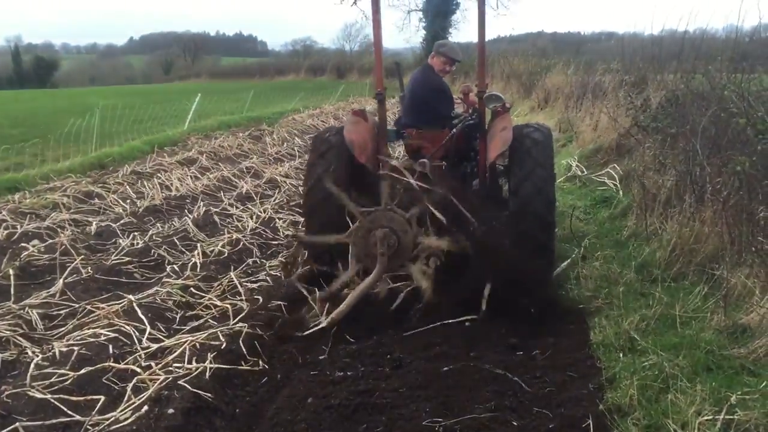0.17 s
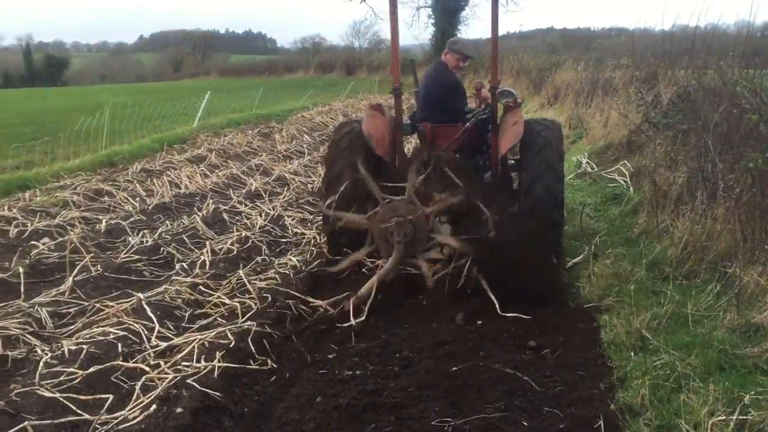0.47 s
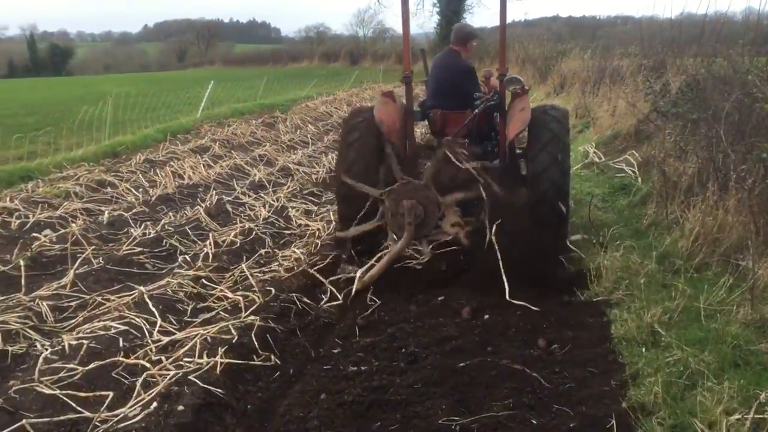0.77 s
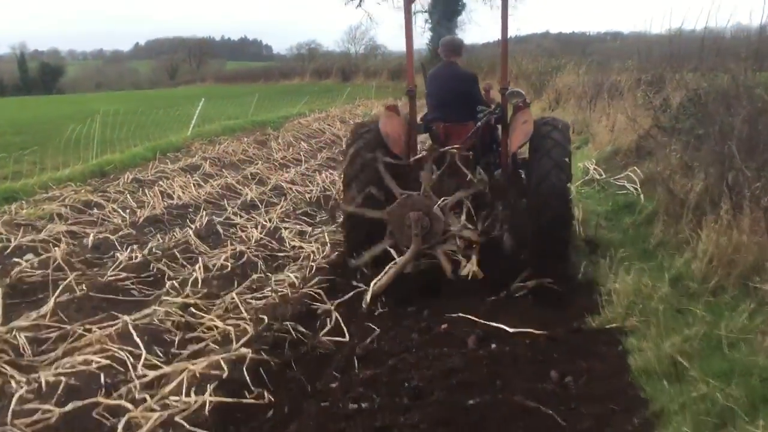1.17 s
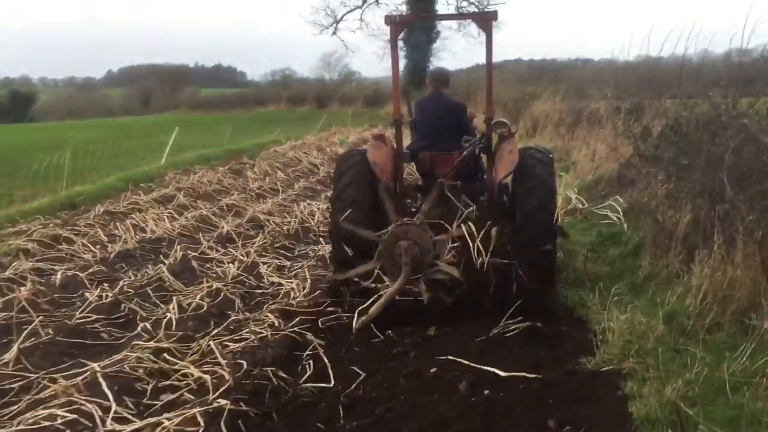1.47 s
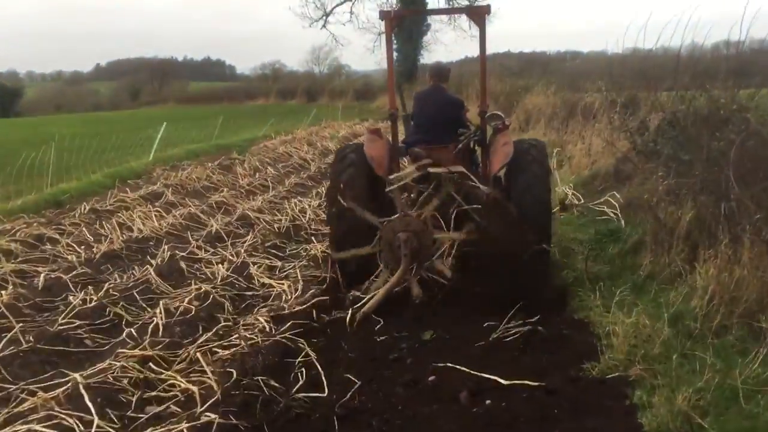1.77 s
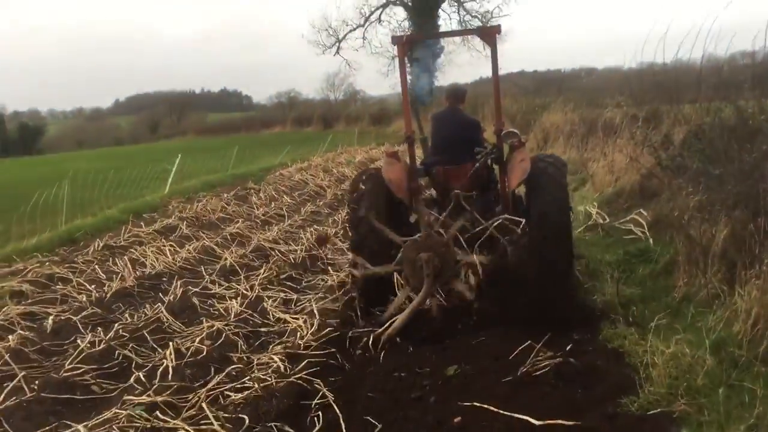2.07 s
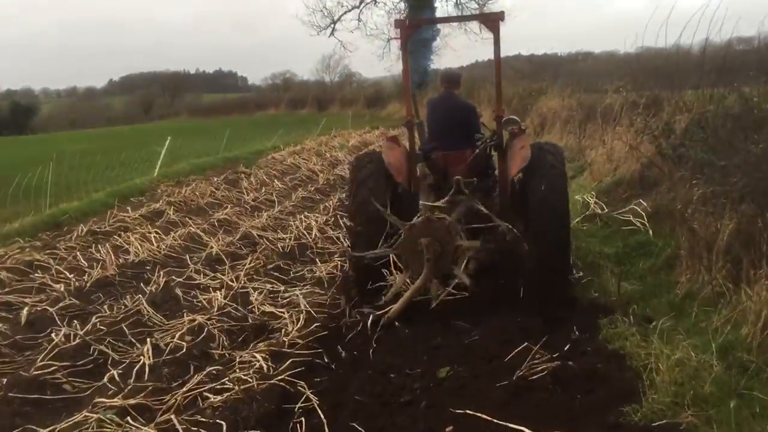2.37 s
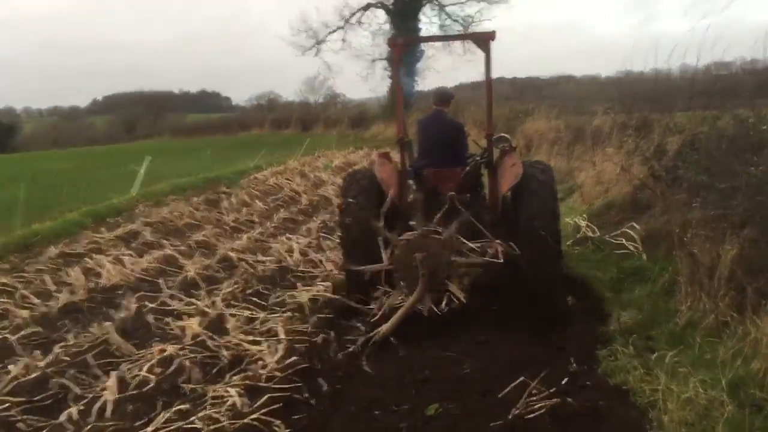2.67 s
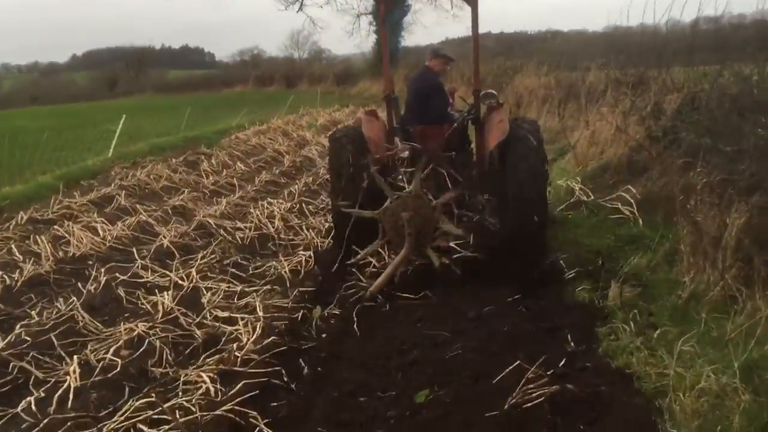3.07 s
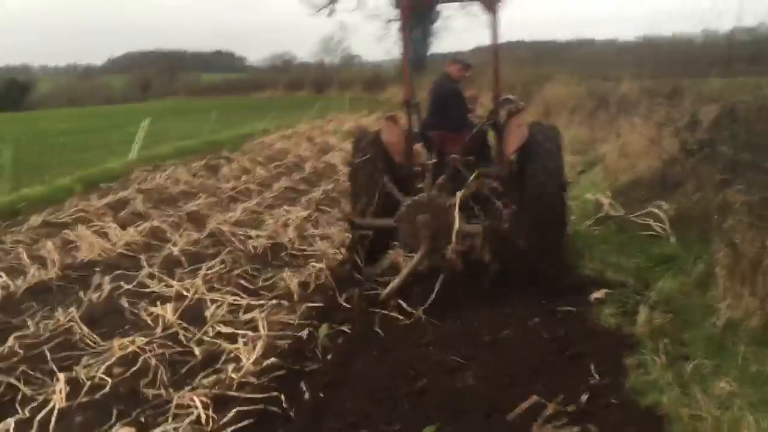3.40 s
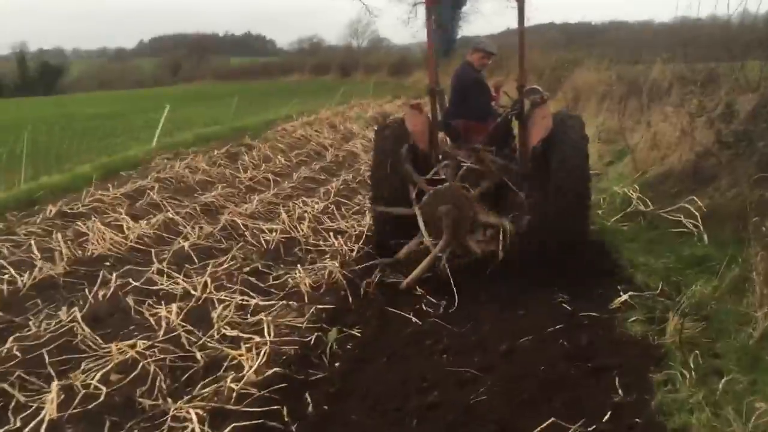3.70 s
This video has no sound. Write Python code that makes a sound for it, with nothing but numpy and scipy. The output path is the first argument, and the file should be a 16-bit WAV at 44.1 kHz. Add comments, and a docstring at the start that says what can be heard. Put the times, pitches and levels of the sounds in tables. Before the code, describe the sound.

Low throbbing old tractor diesel with metallic knocks and churned soil, pulling harder halfway through.

```python
"""A three-cylinder diesel tractor pulls a spinner digger; halfway the engine speeds up under load.
Exhaust: sum of engine-cycle orders. Block: noise-driven modes, struck anew at each firing.
Soil: patchy coloured noise. Gear whine: narrow-band noise. Tappet and grit: resonant noise bursts.
Loud engine knocks ring as two sines; one clod knocks hollowly as a few gliding, decaying sines.
Near the end about 23 ms of the engine's beat is skipped, heard as a step in the beat."""
import sys
import numpy as np
from scipy import signal
from scipy.fft import rfft, irfft, next_fast_len
from scipy.io import wavfile
from scipy.ndimage import uniform_filter1d, map_coordinates

SR = 44100
rng = np.random.default_rng(int(sys.argv[2]) if len(sys.argv) > 2 else 0)


def int16_out(signal):
    """Quantize to a 16-bit WAV file."""
    q = np.round(np.clip(np.atleast_2d(signal).T, -1, 1) * 32767)
    wavfile.write(sys.argv[1], SR, q.astype(np.int16))


N = 169344
CYLINDERS = 3  # a cycle holds one firing of each
CREST_DB = 3  # nominal peak over rms of a short burst


def amp(db):
    """Decibels to amplitude."""
    return 10 ** (np.asarray(db) / 20)


def unit(x):
    """Scale to rms 1."""
    return x / np.sqrt(np.mean(x ** 2) + 1e-20)


def curves(rows):
    """One value per sample for each column after the time."""
    times_s, *columns = np.transpose(rows)
    t = np.arange(N) / SR
    return [np.interp(t, times_s, column) for column in columns]


def wobble(knots_per_s):
    """Smooth random curve through normally distributed knots."""
    knots = rng.standard_normal(int(N * knots_per_s / SR) + 4)
    return map_coordinates(knots, [np.arange(N) * knots_per_s / SR])


def filtered(x, response):
    """Multiply the spectrum of x by a complex response of frequency."""
    m = next_fast_len(x.shape[-1] + 8192)
    spectrum = rfft(x, m) * response(np.fft.rfftfreq(m, 1 / SR))
    return irfft(spectrum, m)[..., :x.shape[-1]]


def peak(hz, width_hz):
    """Response of a causal second-order resonance, gain 1 at its centre."""
    return lambda f: 1j * f * width_hz / (hz * hz - f * f + 1j * f * width_hz)


def rush(spectrum, patchy_db):
    """Coloured noise of rms 1 whose gain varies in random time-frequency patches."""
    z = signal.stft(rng.standard_normal(N), nperseg=512)[2]
    field = uniform_filter1d(rng.standard_normal(z.shape), size=4, axis=0)
    field = uniform_filter1d(field, size=5, axis=1)
    patchy = signal.istft(z * amp(patchy_db * unit(field)), nperseg=512)[1][:N]
    f, db = np.transpose([(spectrum[0][0] / 2, -60), *spectrum, (SR / 2, -120)])
    return unit(filtered(patchy, lambda hz: amp(np.interp(np.log(hz + 1), np.log(f), db))))


def burst(hz, width_hz, t60_s, rise_s):
    """Decaying noise through one resonance twice, peak 1."""
    t = np.arange(SR // 16) / SR
    shape = amp(-60 * t / max(t60_s, .005)) * (1 - np.exp(-t / max(rise_s, 1e-4)))
    resonance = peak(hz, width_hz)
    x = filtered(shape * rng.standard_normal(len(t)), lambda f: resonance(f) ** 2)
    return x / np.abs(x).max()


# Engine speed: (time [s], firing rate [1/s])
FIRING_RATE = [(0.0, 21.92), (0.4, 21.91), (0.8, 21.85), (1.2, 22.25), (1.5, 22.18), (1.8, 21.81),
               (1.9, 21.94), (2.05, 23.54), (2.2, 24.37), (2.35, 25.04), (2.55, 25.12), (2.9, 25.43),
               (3.3, 25.05), (3.84, 25.52)]
START_FIRINGS = .084
SKIP_AT_S, SKIP_FIRINGS = 3.4232, .577


def firings():
    """Firing rate and running firing count, with one skip."""
    rate, = curves(FIRING_RATE)
    skip = SKIP_FIRINGS * (np.arange(N) > SKIP_AT_S * SR)
    return rate, START_FIRINGS + np.cumsum(rate) / SR + skip


# Engine load: (time [s], load [0 light to 1 heavy])
LOAD = [(0, 0), (1.83, 0), (2, .9), (2.3, 1), (3.84, 1)]
# Exhaust orders at light load: (multiple of the cycle rate, level re strongest [dB])
LIGHT_ORDERS = [(1, -42), (2, -40), (3, -38), (4, -36), (5, -33), (6, -12), (7, -22), (8, -22), (9, 0),
                (10, -15), (11, -19), (12, -22), (13, -22), (14, -16), (15, -9), (16, -29), (17, -20),
                (18, -11), (19, -26), (20, -28), (21, -22), (22, -28), (23, -28), (24, -20), (25, -26),
                (26, -30), (27, -29)]
# Exhaust orders at heavy load: (multiple of the cycle rate, level re strongest [dB])
HEAVY_ORDERS = [(1, -39), (2, -38), (3, -38), (4, -36), (5, -36), (6, -8), (7, -20), (8, -27), (9, 0),
                (10, -21), (11, -19), (12, -7), (13, -23), (14, -27), (15, -12), (16, -28), (17, -24),
                (18, -21), (19, -30), (20, -27), (21, -22), (22, -27), (23, -38), (24, -31), (25, -32),
                (26, -36), (27, -30)]
# Exhaust pipe resonances, phase only: (frequency [Hz], width [Hz])
PIPE = [(57, 16), (165, 30)]
# Low rumble spectrum: (frequency [Hz], relative density [dB per Hz])
RUMBLE = [(15, -39), (35, -53), (80, -2), (150, -0.5), (230, -5), (400, -29)]
LIGHT_PEAK_DB, HEAVY_PEAK_DB = -25.5, -22  # strongest order
WAVER_DB = 1  # scale of each order's random level curve
PUFF_FIRINGS = 2.52  # puff position in the cycle
UNEVEN_TURNS = .18  # lead of orders between firing multiples
LEAD_HZ, LEAD_TURNS = 88, .22  # orders above this pitch lead under full load
SHAFT_ORDER, SHAFT_PEAK_DB = 4.09, (-38, -37)  # multiple of firing rate; light, heavy load
RUMBLE_LIGHT_DB, RUMBLE_LOAD_DB = -43, 2  # rms at light load; rise at full load


def exhaust():
    """Cycle orders aligned on the puff, phase-lagged by pipe resonances; geared shaft hum; rumble."""
    rate, count = firings()
    load, = curves(LOAD)
    out = np.zeros(N)
    for (k, light_db), (_, heavy_db) in zip(LIGHT_ORDERS, HEAVY_ORDERS):
        db = (light_db + LIGHT_PEAK_DB) * (1 - load) + (heavy_db + HEAVY_PEAK_DB) * load
        db = db + WAVER_DB * wobble(7)
        hz = k / CYLINDERS * rate
        lag = sum(np.arctan2(hz * width, centre ** 2 - hz ** 2) for centre, width in PIPE)
        turns = k / CYLINDERS * (count - PUFF_FIRINGS) + UNEVEN_TURNS * (k % CYLINDERS > 0)
        turns = turns + LEAD_TURNS * load / (1 + (LEAD_HZ / hz) ** 12)
        out = out + amp(db) * np.cos(2 * np.pi * turns - lag)
    shaft_db = np.interp(load, (0, 1), SHAFT_PEAK_DB) + WAVER_DB * wobble(7.2)
    shaft = amp(shaft_db) * np.cos(2 * np.pi * SHAFT_ORDER * count)
    rumble = amp(RUMBLE_LIGHT_DB + RUMBLE_LOAD_DB * load) * rush(RUMBLE, patchy_db=2)
    return out + shaft + rumble


# Block modes, each passed twice: (frequency [Hz], width of one pass [Hz], relative level [dB])
BLOCK = [(475, 94, -4), (694, 116, -4), (856, 71, 2), (963, 224, 1.5), (1202, 140, 2), (1328, 48, -3),
         (1457, 140, 1), (1818, 226, 1), (2095, 360, -5.5), (2329, 243, -1), (2626, 255, -6),
         (2948, 510, -11.5), (3665, 230, -17.5), (4145, 120, -23.5), (4470, 270, -22), (5080, 860, -28.5),
         (7480, 850, -28), (8100, 1400, -26.5), (8770, 910, -26), (11300, 1700, -34.5), (13200, 2500, -46)]
# Knock per cylinder; rows bass, middle, treble: (cylinder 1 [dB], cylinder 2 [dB], cylinder 3 [dB])
CYLINDER_KNOCK = [(-3.5, 0.47, 2.3), (-6, 3.5, 1.9), (0, 1.9, .4)]
# Clatter before trims: (time [s], level [dB], treble level [dB])
CLATTER = [(0.0, -41, -63), (0.03, -38.5, -58.5), (0.18, -42, -63), (0.2, -38.5, -70), (0.26, -40, -64),
           (0.87, -40.5, -63), (1.33, -40.5, -62.5), (1.68, -39.5, -63), (1.82, -41, -75),
           (1.88, -36, -51.5), (2.08, -38, -55), (2.52, -37.5, -55), (2.54, -39.5, -49), (2.58, -38, -54.5),
           (2.75, -39, -57), (3.03, -39.5, -63), (3.39, -39, -59), (3.8, -40, -58)]
# Air before trims: (time [s], level of the clatter's top band [dB], fine soil hiss level [dB])
AIR = [(0.0, -66.5, -64.5), (0.26, -65, -63.5), (0.69, -67.5, -69.5), (1.25, -65.5, -66.5),
       (1.39, -73, -61.5), (1.55, -69, -67.5), (1.76, -70, -62.5), (2.1, -72, -56.5), (2.3, -64, -65.5),
       (2.43, -63, -59.5), (2.63, -68, -62), (2.85, -63, -64), (3.06, -67.5, -67), (3.31, -62, -59),
       (3.49, -67.5, -64.5), (3.84, -64.5, -64)]
BODY_TRIM_DB, TREBLE_TRIM_DB, TOP_TRIM_DB = -0.5, -5, -0.5
MIDDLE_HZ, TREBLE_HZ, TOP_BAND_HZ = 1300, 3300, 6000  # lower band edges
KNOCK_FIRINGS, TAP_FIRINGS, TAP_DB = 0.32, 0.71, -16  # positions in a firing; valve tap re knock
KNOCK_T60_S, KNOCK_RISE_S = 0.073, 0.0046
MODE_SCATTER_DB, KNOCK_SCATTER_DB = 2.8, 1.2  # std per hit: each mode; all modes together
BUZZ_DB, BUZZ_SWING_DB = (-21, -15), 3  # shaking between knocks: below treble, treble and up
BRIGHTER = 0.41  # dB per dB of soil hiss, modes from 1700 to 3300 Hz


def block():
    """Knock and valve tap of each firing drive the block's modes with noise, freshly scaled."""
    rate, count = firings()
    level_db, treble_db = curves(CLATTER)
    top_db, hiss_db = curves(AIR)
    body, treble, top = bands = np.zeros((3, N))
    shared_db = KNOCK_SCATTER_DB * rng.standard_normal(N // 500)  # one per firing, with spares
    for hz, width, db in BLOCK:
        drive = amp(BUZZ_DB[int(hz > TREBLE_HZ)] + BUZZ_SWING_DB * wobble(12))
        cylinder_db = np.array(CYLINDER_KNOCK[(hz > MIDDLE_HZ) + (hz > TREBLE_HZ)])
        for at, hit_db in ((KNOCK_FIRINGS, 0), (TAP_FIRINGS, TAP_DB)):
            index, since = np.divmod(count + CYLINDERS - at, 1)
            index, t = index.astype(int), since / rate
            size_db = MODE_SCATTER_DB * rng.standard_normal(index[-1] + 1)[index]
            size_db = size_db + shared_db[index] + cylinder_db[index % CYLINDERS]
            decay = amp(hit_db + size_db - 60 * t / KNOCK_T60_S)
            drive = drive + decay * (1 - np.exp(-t / KNOCK_RISE_S))
        mode = peak(hz, width)
        mode_db = db + BRIGHTER * (hiss_db - hiss_db.mean()) * (1700 < hz < 3300)
        ring = filtered(drive * rng.standard_normal(N), lambda f: mode(f) ** 2)
        bands[(hz > TREBLE_HZ) + (hz > TOP_BAND_HZ)] += amp(mode_db) * ring
    return (amp(level_db + BODY_TRIM_DB) * unit(body) + amp(treble_db + TREBLE_TRIM_DB) * unit(treble)
            + amp(top_db + TOP_TRIM_DB) * unit(top))


# Soil spectrum: (frequency [Hz], relative density [dB per Hz])
SOIL = [(150, -6), (260, -6.5), (303, -2.5), (458, -3.5), (513, -5.5), (759, -3), (868, -3.5), (1100, -5),
        (1410, 1.5), (2020, -9.5), (2310, -10), (2510, -18), (3050, -17.5), (3960, -48), (6710, -120)]
# Fine soil hiss spectrum: (frequency [Hz], relative density [dB per Hz])
HISS = [(2500, -9), (3500, -4.5), (5000, -5.5), (6300, -8.5), (8500, -6), (10300, -12.5), (11500, -12.5),
        (13500, -23), (15500, -28)]
SOIL_TRIM_DB, HISS_TRIM_DB = 0.5, -3.5  # on the clatter level; on the hiss level


def soil():
    """Soil off the tines: patchy noise following the clatter level, plus patchier fine hiss."""
    level_db, _ = curves(CLATTER)
    _, hiss_db = curves(AIR)
    coarse = amp(level_db + SOIL_TRIM_DB) * rush(SOIL, patchy_db=2.0)
    fine = amp(hiss_db + HISS_TRIM_DB) * rush(HISS, patchy_db=7.5)
    return coarse + fine


# Gear tone before trim: (time [s], level [dB])
WHINE = [(0.0, -57), (0.37, -42), (0.39, -38), (0.63, -46), (0.67, -38), (0.72, -56), (0.76, -38.5),
         (0.93, -49), (0.97, -41.5), (1.17, -46), (1.25, -38.5), (1.27, -43), (1.96, -48.5), (1.97, -40.5),
         (2.69, -49), (3.8, -42.5)]
WHINE_HZ, WHINE_WIDTH_HZ, WHINE_TRIM_DB = 462, 30, -4


def whine():
    """Gear tone: noise in one narrow resonance, coming and going."""
    tone = filtered(rng.standard_normal(N), peak(WHINE_HZ, WHINE_WIDTH_HZ))
    return amp(curves(WHINE)[0] + WHINE_TRIM_DB) * unit(tone)


# Tappet, mostly once a cycle: (time [s], peak [dB], pitch [Hz], low note nominal rms [dB])
PINGS = [(0.0114, -56, 7610, -57), (0.194, -59, 7660, -69), (0.2864, -50, 7400, -56),
         (0.3321, -51, 8100, -56), (0.4224, -55, 7670, -51), (0.564, -53, 7400, -56),
         (0.6975, -48, 7100, -56), (1.2855, -56, 7570, -64), (1.5574, -55, 7600, -63),
         (1.693, -55, 7610, -57), (1.784, -49.5, 7050, -49), (1.922, -46, 7820, -45.5),
         (1.9654, -50.5, 8730, -48), (2.1765, -53, 7650, -67), (2.2588, -53, 8560, -59),
         (2.419, -49, 7530, -54), (2.5385, -53, 7600, -53), (2.657, -49, 7870, -66),
         (2.7287, -41, 8040, -58), (2.7771, -46.5, 7430, -56), (2.9327, -56, 7960, -77),
         (3.0114, -50, 7500, -56), (3.1744, -57, 7300, -60), (3.2525, -60, 7860, -54),
         (3.3695, -53, 7400, -56), (3.507, -52, 8270, -66), (3.701, -53, 7700, -57)]
PING_LOW_HZ, PING_WIDTH_HZ = 4400, (550, 300)  # widths of one pass: high, low note
PING_T60_S, PING_RISE_S = .04, .002  # noise envelope


def tappet():
    """Two narrow noise-driven notes struck together."""
    out = np.zeros(N + SR)
    high_width, low_width = PING_WIDTH_HZ
    for s, db, hz, low_db in PINGS:
        high = amp(db) * burst(hz, high_width, PING_T60_S, PING_RISE_S)
        low = amp(low_db + CREST_DB) * burst(PING_LOW_HZ, low_width, PING_T60_S, PING_RISE_S)
        out[round(s * SR):][:len(high)] += high + low
    return out[:N]


# Loud grit on steel: (time [s], peak [dB], pitch [Hz], t60 [s], broad spit nominal rms [dB])
TICKS = [(1.2365, -38, 4300, 0.018, -56), (1.3824, -36, 3550, 0.025, -54), (1.436, -47, 4300, 0.025, -53),
         (1.49, -38.5, 4170, 0.034, -54), (1.917, -33, 3370, 0.022, -55), (2.0015, -42.5, 4370, 0.031, -52),
         (2.0526, -30.5, 3250, 0.02, -53), (2.0666, -31, 4130, 0.02, -47), (2.0911, -32, 3320, 0.016, -42),
         (2.1114, -50, 3410, 0.023, -63), (2.136, -39, 3340, 0.033, -61), (2.177, -40, 3250, 0.025, -63),
         (2.2124, -47, 3710, 0.022, -65), (2.302, -44, 3300, 0.023, -77), (2.3637, -40.5, 3280, 0.038, -46),
         (2.4608, -41, 3520, 0.023, -72), (2.4714, -41.5, 3720, 0.025, -76),
         (2.6174, -40, 3810, 0.027, -70), (2.6335, -38.5, 3940, 0.03, -71), (2.7332, -45, 3600, 0.029, -60),
         (2.9944, -50, 3610, 0.044, -58), (3.0904, -49, 3770, 0.025, -69), (3.2121, -45, 3340, 0.023, -60),
         (3.3288, -45, 3420, 0.025, -61)]
TICK_WIDTH, TICK_RISE_S = .28, .003  # one-pass width over pitch
SPIT_HZ, SPIT_WIDTH_HZ, SPIT_T60_RATIO = 8200, 7200, 1.6
GRIT_PER_S, GRIT_DB, GRIT_SPREAD_DB = 25, -4, 2.5  # small ticks: floor re treble column; mean excess


def grit():
    """Pitched noise ticks with a broad spit: loud ones listed, small ones at random."""
    u = rng.random((int(GRIT_PER_S * N / SR), 3))
    floor_db = curves(CLATTER)[1][(u[:, 0] * N).astype(int)] + GRIT_DB
    small_db = floor_db - GRIT_SPREAD_DB * np.log(u[:, 1])
    small_hz = 3500 * 3 ** u[:, 2]
    small = np.c_[u[:, 0] * N / SR, small_db, small_hz, np.full(len(u), .03), small_db - 20]
    out = np.zeros(N + SR)
    for s, db, hz, t60_s, spit_db in [*TICKS, *small]:
        tick = amp(db) * burst(hz, TICK_WIDTH * hz, t60_s, TICK_RISE_S)
        spit = burst(SPIT_HZ, SPIT_WIDTH_HZ, SPIT_T60_RATIO * t60_s, TICK_RISE_S)
        out[round(s * SR):][:len(tick)] += tick + amp(spit_db + CREST_DB) * spit
    return out[:N]


# Loud knock rings: (time [s], level before trim and rise [dB], pitch [Hz], t60 [s])
KNOCK_RINGS = [(0.243, -31, 2240, 0.05), (0.382, -32, 786, 0.067), (0.747, -29, 1186, 0.056),
               (1.471, -30.5, 930, 0.084), (1.965, -20.5, 1390, 0.038), (2.052, -24.5, 1300, 0.074),
               (2.067, -15.5, 1400, 0.023), (2.098, -16, 1070, 0.032), (2.138, -30, 945, 0.049),
               (2.218, -24, 1220, 0.05), (2.262, -16.5, 1060, 0.021), (2.339, -25.5, 1290, 0.034),
               (2.383, -21, 1100, 0.038), (2.463, -27, 1240, 0.079), (2.62, -31, 836, 0.034),
               (2.734, -49, 5580, 0.076), (2.74, -19.5, 1010, 0.021), (3.096, -24.5, 956, 0.05),
               (3.213, -28, 1700, 0.031), (3.331, -25, 1860, 0.027), (3.43, -22.5, 1030, 0.027),
               (3.547, -26, 1830, 0.056), (3.638, -19, 1280, 0.041), (3.755, -28, 1323, 0.049)]
RING_TRIM_DB, RING_RISE_S = -0.5, 0.0011
OVERTONE_RATIO, OVERTONE_DB = 1.4, -13


def loud_knocks():
    """Loud engine knocks ring: a decaying note and one inharmonic overtone."""
    out, t = np.zeros(N + SR), np.arange(SR // 10) / SR
    for s, db, hz, t60_s in KNOCK_RINGS:
        turns = rng.random(2)
        note = np.sin(2 * np.pi * (hz * t + turns[0]))
        overtone = np.sin(2 * np.pi * (OVERTONE_RATIO * hz * t + turns[1]))
        shape = amp(db + RING_TRIM_DB - 60 * t / t60_s) * (1 - np.exp(-t / RING_RISE_S))
        out[round(s * SR):][:len(t)] += shape * (note + amp(OVERTONE_DB) * overtone)
    return out[:N]


# Clod knock: (time [s], level before rise [dB])
CLOD = [(1.2388, -3.5)]
# Hollow modes of the clod: (settled frequency [Hz], relative level [dB], t60 [s])
HOLLOW = [(634, -0.3, 0.015), (692, -5.6, 0.02), (822, -4.7, 0.016), (2530, -19, 0.012)]
GLIDE_SHARE, GLIDE_S, CLOD_RISE_S = 0.377, 0.0007, 0.0011  # pitch starts this share high


def clod():
    """Hollow knock: decaying modes whose pitch settles downward."""
    out, t = np.zeros(N), np.arange(SR // 20) / SR
    bent_t = t + GLIDE_SHARE * GLIDE_S * (1 - np.exp(-t / GLIDE_S))
    rise = 1 - np.exp(-(t / CLOD_RISE_S) ** 2)
    for s, db in CLOD:
        ring = sum(amp(mode_db - 60 * t / t60_s) * np.sin(2 * np.pi * hz * bent_t)
                   for hz, mode_db, t60_s in HOLLOW)
        out[round(s * SR):][:len(t)] -= amp(db) * ring * rise
    return out


def scene():
    """Sum of all sources, one channel."""
    engine = exhaust() + block() + loud_knocks()
    return (engine + soil() + whine() + tappet() + grit() + clod())[None]


TOP_HZ = 16000


def record(dry):
    """Remove everything from the band limit up."""
    return filtered(dry, lambda hz: hz < TOP_HZ)


dry = scene()
out = record(dry)
int16_out(out)
```